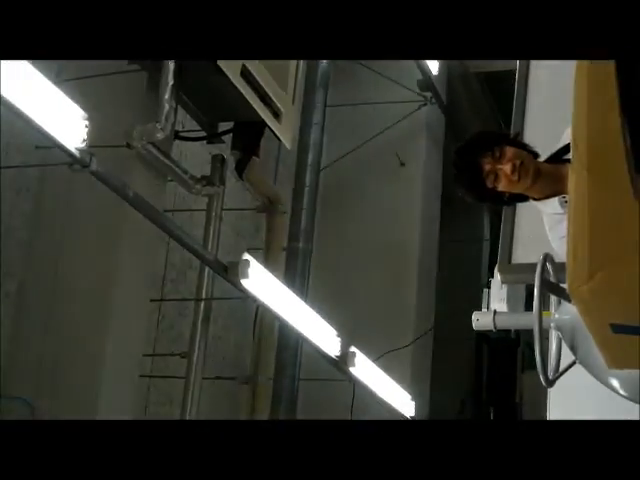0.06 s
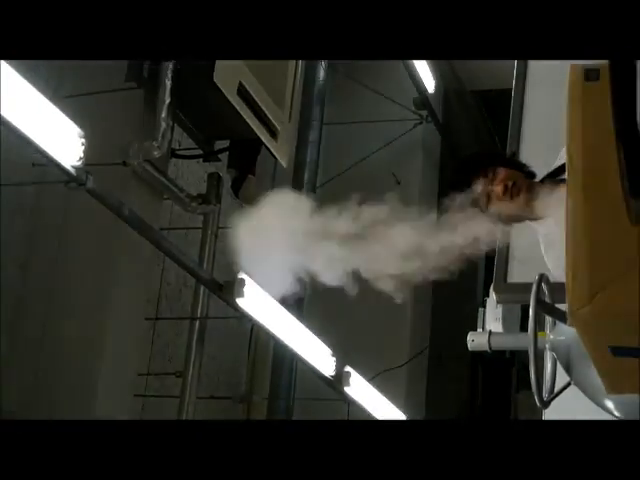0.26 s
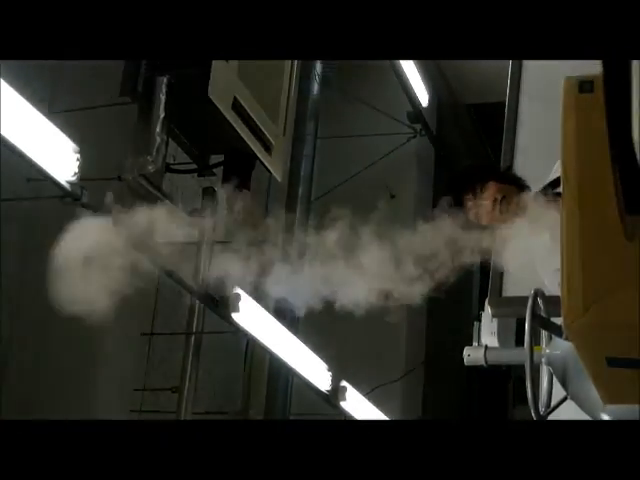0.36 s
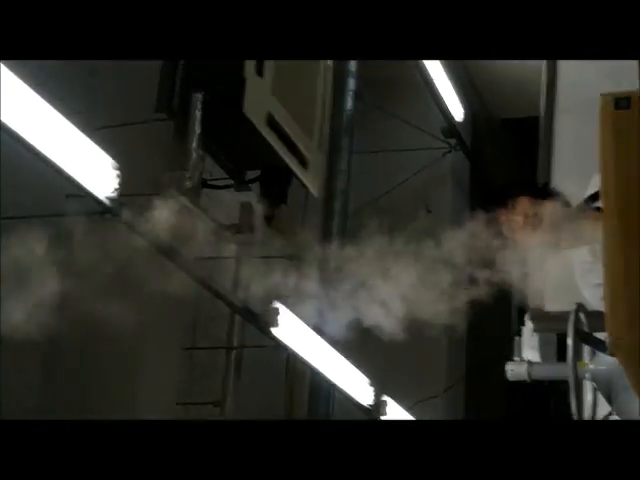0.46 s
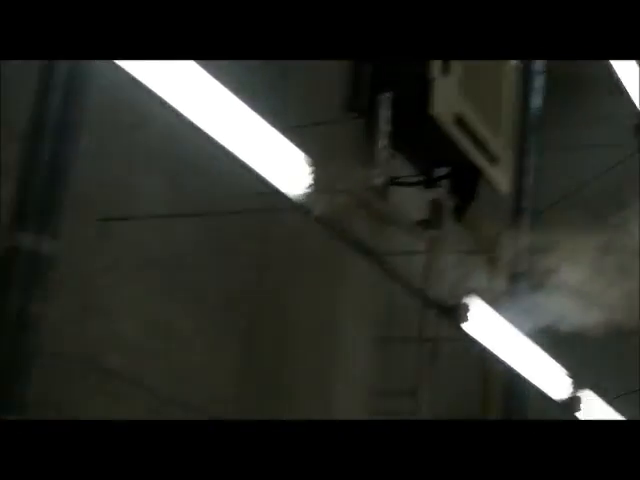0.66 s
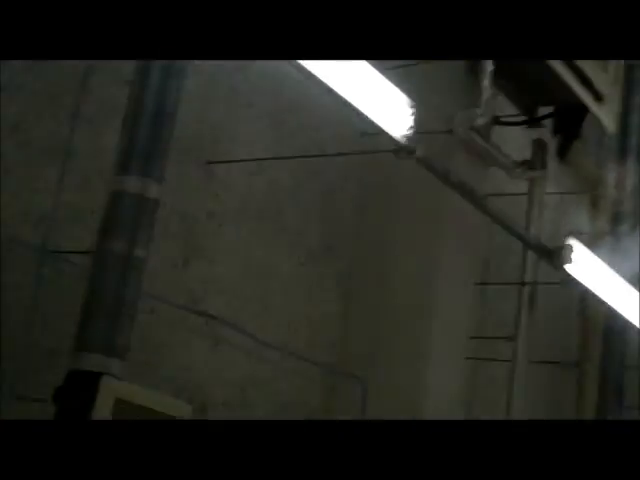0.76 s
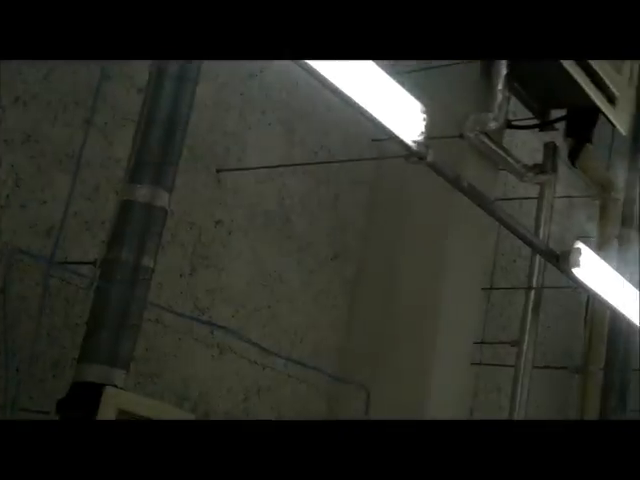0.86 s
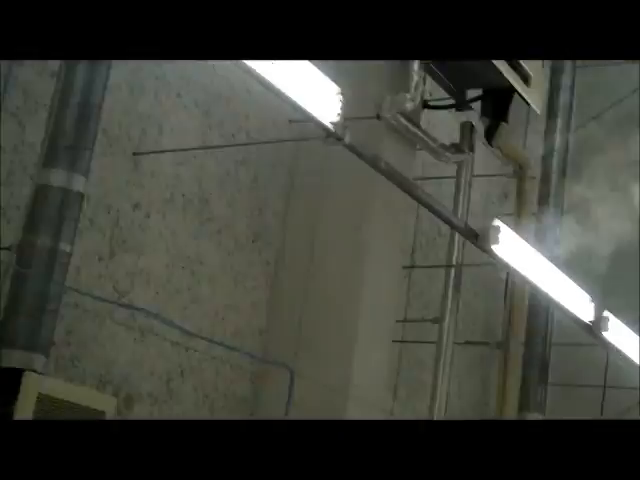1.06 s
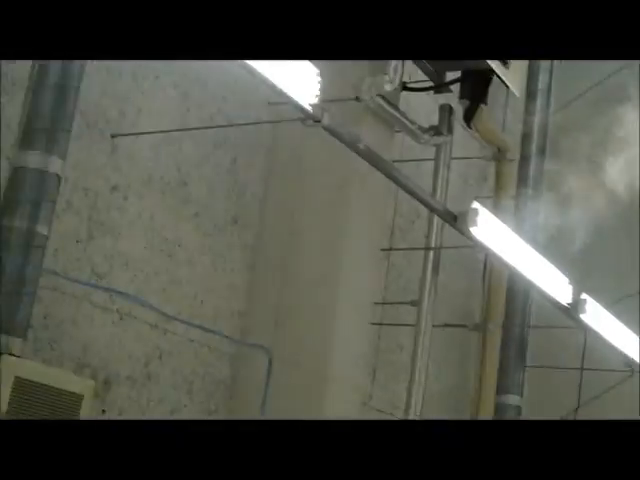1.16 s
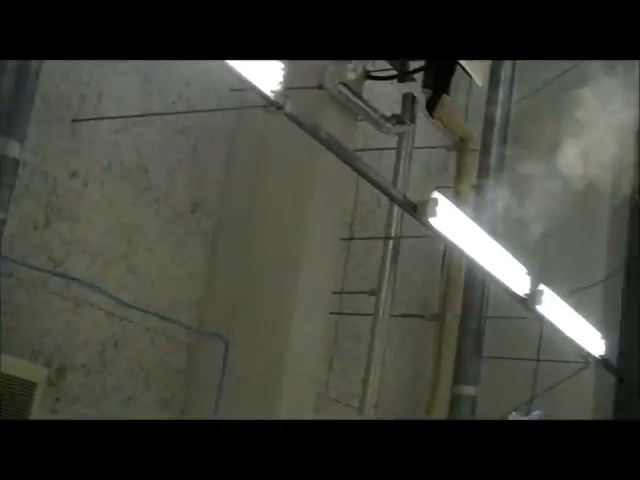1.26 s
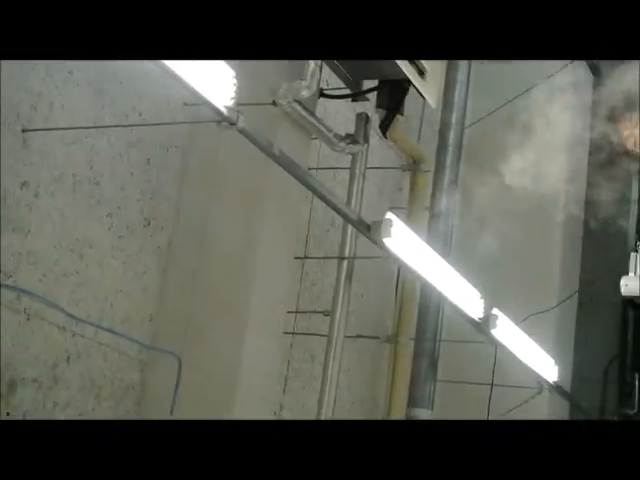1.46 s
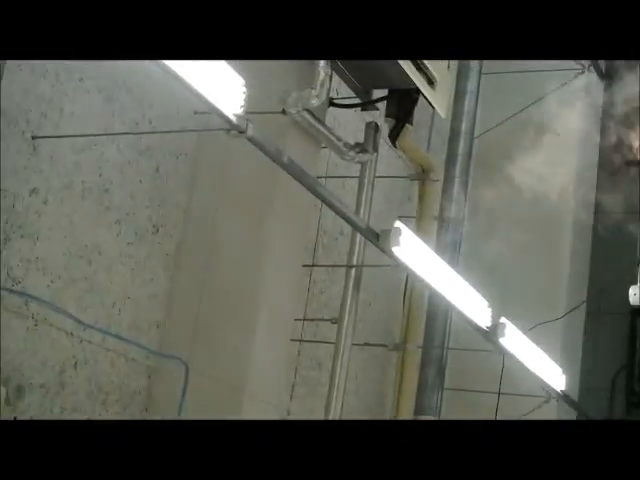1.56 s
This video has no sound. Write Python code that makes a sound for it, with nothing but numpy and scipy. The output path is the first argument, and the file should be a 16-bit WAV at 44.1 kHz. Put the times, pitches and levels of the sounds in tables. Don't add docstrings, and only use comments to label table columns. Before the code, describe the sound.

An air cannon booms once at 0.22 s, close and clipped, with a low thump near 200 Hz and a sharp jet crack. Before it, ventilation hums and a valve hiss fades. Hard walls return low swells for about half a second as the level ducks and recovers. A light plug taps at 0.70-0.77; metal links rattle at 0.95, 1.10 and 1.30, the last with a dull thud; air leaks thinly from 1.42.

```python
import sys
import numpy as np
from scipy import signal
from scipy.fft import rfft, irfft, next_fast_len
from scipy.io import wavfile

SR = 44100
rng = np.random.default_rng(int(sys.argv[2]) if len(sys.argv) > 2 else 0)


def log_audio(samples):
    frames = np.atleast_2d(samples).T
    limited = np.clip(frames, -1, 1)
    pcm = np.round(limited * 32767).astype(np.int16)
    wavfile.write(sys.argv[1], SR, pcm)


def boost_factor(decibels):
    exponent = np.asarray(decibels, float) / 20
    return 10 ** exponent


N = 70560

SHOT_S = 0.2205
PLUG_WET_DB = -12
RATTLE_STAY = 0.68

# pitch_hz, likeness [-1 to 1]
HALL_ALIKE = [(60, 0.87), (180, 0.92), (550, 0.84), (1650, 0.34), (4970, 0.091), (15000, -0.0041)]
# pitch_hz, level_db [per Hz]
JET_AHEAD = [(150, -21), (400, 1), (850, 2), (2500, -4.5), (4500, -5.5), (9000, -4), (15000, -4)]
# delay_s, level_db, pitch_hz, length_s
CEILING = (.0141, 3, 191, .022)


def unit(x):
    return x / np.sqrt(np.mean(x ** 2) + 1e-20)


def along(points, hz):
    f, v = np.transpose(points)
    return np.interp(np.log(hz + 1), np.log(f + 1), v)


def level(rows):
    s, db = np.transpose(rows)
    return boost_factor(np.interp(np.arange(N) / SR, s, db, left=-120, right=db[-1]))


def filtered(x, response):
    m = next_fast_len(x.shape[-1] + SR // 4)
    spectrum = rfft(x, m) * response(np.fft.rfftfreq(m, 1 / SR))
    return irfft(spectrum, m)[..., :x.shape[-1]]


def resonance(f, hz, width):
    return 1j * f * width / (hz * hz - f * f + 1j * f * width)


def pair(x, alike):
    def mix(hz):
        turn = np.arccos(np.clip(along(alike, hz), -1, 1)) / 2
        return np.array([np.cos(turn), np.sin(turn)])
    mid, side = filtered(x, mix)
    return np.array([mid + side, mid - side])


def air(spectrum, alike, size=N):
    noise = rng.standard_normal((2, size))
    coloured = filtered(noise, lambda hz: boost_factor(along(spectrum, hz)))
    return unit(pair(coloured, alike))


def burst(t, hold, t60):
    return (1 - np.exp(-t / 0.00033)) * boost_factor(-60 * np.maximum(t - hold, 0) / t60)


def add_at(out, s, sound):
    out[:, round(s * SR):][:, :sound.shape[-1]] += sound


def hall(x, stay=1, alike=HALL_ALIKE):
    # pitch_hz, t60_s
    hall_decay = [(100, 0.9), (220, 1.05), (500, .75), (1000, .8), (2000, 0.81), (6000, 0.73),
                  (14000, 0.58)]
    hz, t, z = signal.stft(rng.standard_normal((2, N)), SR, nperseg=256)
    t60 = stay * along(hall_decay, hz)[:, None]
    tail = signal.istft(z * boost_factor(-60 * t / t60), SR, nperseg=256)[1]
    build_up = 1 - np.exp(-np.arange(tail.shape[1]) / SR / 0.008)
    tail = pair(tail, alike) * build_up
    right_db = 1.5
    tail = tail * boost_factor([[-right_db / 2], [right_db / 2]]) / np.linalg.norm(tail[0])
    return signal.fftconvolve(x[None], tail, axes=1)[:, :N]


def ventilation():
    # pitch_hz, level_db [per Hz]
    vent_colour = [(20, -4), (60, -6.5), (130, -12), (250, -9), (500, -14), (1500, -18.5), (3600, -22),
                   (15700, -24.5)]
    # pitch_hz, likeness [-1 to 1]
    vent_alike = [(60, 0.6), (180, 0.86), (550, 0.48), (1650, 0.11), (4970, -0.14), (15000, 0.27)]
    # pitch_hz, width_hz, level_db [rms]
    duct_rows = [(235, 18.5, -54.5), (385, 58, -56.5), (682, 27, -56.5)]
    out = boost_factor(-41) * air(vent_colour, vent_alike)
    for hz, width, db in duct_rows:
        hum = filtered(rng.standard_normal(N), lambda f: resonance(f, hz, width) ** 2)
        out += boost_factor(db) * unit(hum)
    return out


def escaping_air():
    # time_s, level_db
    valve_rows = [
        (0.0, -39.5),
        (0.142, -58),
        (0.162, -56.5),
        (0.212, -46),
        (0.215, -48),
    ]
    # pitch_hz, level_db [per Hz]
    valve_colour = [(1000, -27), (2000, -10.5), (4000, -5), (7300, 0), (11000, -0.5), (15700, -13.5)]
    # time_s, level_db
    leak_rows = [
        (1.42, -57),
        (1.452, -51),
        (1.52, -42),
        (1.6, -43),
    ]
    # pitch_hz, level_db [per Hz]
    leak_colour = [(4000, -43), (8000, -19), (10500, -5), (12700, -2), (14000, -12), (15700, -32)]
    alike = [(2000, 0.28), (8000, 0.17)]  # pitch_hz, left-right likeness
    before_shot = np.arange(N) < SHOT_S * SR
    valve = level(valve_rows) * before_shot * air(valve_colour, alike)
    leak = level(leak_rows) * air(leak_colour, alike)
    return boost_factor(2.5) * valve + leak


def barrel_boom(t):
    swing = -boost_factor(11) * burst(t, 0.0098, 0.004) * np.sin(2 * np.pi * 212 * t + 0.75)
    overtone = boost_factor(-3) * burst(t, 0, 0.1) * np.sin(2 * np.pi * 370 * t)
    return swing + overtone


def jet(t):
    # pitch_hz, level_db [per Hz]
    jet_colour = [(150, -6), (600, -4), (1200, -11), (1900, -3), (2900, -5), (4500, -17), (9000, -24),
                  (15000, -26)]
    return burst(t, 0.008, 0.03) * air(jet_colour, [(1000, 0.86), (6000, 0.38)], size=len(t))


def wall_cracks(out, t):
    # delay_s, level_db
    crack_rows = [
        (.0105, -5),
        (.0145, -15),
        (.02, -18),
        (.031, -13.5),
        (.040, -16.5),
    ]
    for delay, db in crack_rows:
        noise = air(JET_AHEAD, HALL_ALIKE, size=len(t))
        crack = filtered(noise, lambda f: f / (f + 6000))
        add_at(out, SHOT_S + delay, boost_factor(db + 13) * burst(t, 0.0015, 0.014) * crack)


def wall_booms(out, t):
    # delay_s, level_db, pitch_hz, length_s
    boom_rows = [CEILING, (0.039, -12.5, 246, 0.013), (0.06, -9.5, 230, 0.014), (0.087, -10, 206, 0.021),
                 (.118, -10.5, 233.6, 0.03), (0.168, -13, 192, 0.038), (.2, -14, 221, 0.0333),
                 (0.24, -15, 199.6, 0.018), (0.278, -18.5, 235, .045), (0.338, -25, 198, 0.038),
                 (0.377, -27, 219, 0.017), (0.403, -26, 217, 0.045), (0.529, -36.5, 231.6, 0.043),
                 (.06, -19, 280, .04), (.19, -22, 275, .05), (.13, -33, 105, .1), (.38, -37, 135, .08)]
    for delay, db, hz, length in boom_rows:
        swell = np.sin(np.pi * np.clip(t / length, 0, 1))
        lag_s = 0.0003 * rng.normal() * np.array([[0.5], [-0.5]])
        add_at(out, SHOT_S + delay, boost_factor(db + 2) * swell * np.sin(2 * np.pi * hz * (t + lag_s)))


def shot():
    t = np.arange(SR // 8) / SR
    out = np.zeros((2, N + SR))
    boom = barrel_boom(t)
    add_at(out, SHOT_S, boom + jet(t))
    wall_cracks(out, t)
    wall_booms(out, t)
    start = round(SHOT_S * SR)
    low = np.pad(boom, (start, N))[:N]
    front = np.zeros(N)
    front[start] = boost_factor(43)
    jet_front = filtered(front, lambda f: boost_factor(along(JET_AHEAD, f)))
    return out[:, :N] + boost_factor(-13) * hall(low) + boost_factor(-15) * hall(jet_front)


def plug():
    # time_s, level_db [peak], dullness_db [lost per higher resonance]
    tap_rows = [
        (.7029, -16, 0.5),
        (.7045, -26, 1),
        (.7335, -27, 4),
        (.741, -26, 14),
        (.745, -25, 9),
        (.772, -30, 9),
    ]
    # pitch_hz, width_hz, level_db
    body_rows = [(765, 350, 6), (1200, 610, -1), (2100, 570, 2), (3140, 1200, -1.5), (5730, 1800, -7.5)]
    dry = np.zeros(N)
    for s, db, dull in tap_rows:
        tap = np.zeros(N)
        tap[round(s * SR)] = boost_factor(db + 20.5)

        def body(f):
            total = 0
            for k, (hz, width, body_db) in enumerate(body_rows):
                total = total + (-1) ** k * boost_factor(body_db - k * dull) * resonance(f, hz, width)
            return total
        dry += filtered(tap, body)
    dry = filtered(dry, lambda f: 1 / (1 + 1j * f / 6500) ** 2)
    return dry + boost_factor(PLUG_WET_DB) * hall(dry)


def links():
    # time_s, level_db [peak], length_s, ring_db [ring over scrape]
    contact_rows = [(.9500, -15, 0.0038, -2.5), (0.9553, -16, 0.0047, 2), (0.966, -12, 0.0022, 1),
                    (0.9695, -16, 0.003, 3.5), (0.9759, -13.5, 0.0057, 5), (.9850, -27, .008, -2),
                    (.9995, -24, .002, 6), (1.0378, -28, .001, 10), (1.1034, -12.5, .002, 7.5),
                    (1.106, -18.5, 0.0023, 4), (1.1104, -14.5, 0.0055, -5), (1.123, -24, 0.0082, -2),
                    (1.1347, -13, .002, 6), (1.145, -25, 0.0059, -6), (1.153, -27.5, 0.0031, 7),
                    (1.2982, -16, 0.0023, 1), (1.302, -22, .003, 2), (1.3208, -26, 0.0024, 2),
                    (1.3090, -26, .011, 0), (1.3270, -31, .012, 0), (1.0050, -28, .014, -2),
                    (1.1630, -30, .015, -4)]
    # pitch_hz, level_db, t60_s
    mode_rows = [(6100, -8, .006), (11770, -10, .008), (12580, -3, 0.0094), (12900, 4, 0.0072),
                 (13330, 1, 0.0058), (13900, -5, 0.0065), (14650, -8, 0.0063)]
    # pitch_hz, level_db [per Hz]
    scrape_colour = [(700, -52), (1200, -11), (3400, -6.5), (4500, -6.5), (6000, 0), (8000, -1.5),
                     (11000, -3.5), (15700, -5)]
    # pitch_hz, likeness [-1 to 1]
    rattle_alike = [(1500, .5), (4000, -.2), (9000, -.2), (13000, .2)]
    # pitch_hz, level_db
    far_colour = [(1000, 2), (6000, 2), (10000, 2.5), (13000, -7.5)]

    def modes(f):
        total = 0
        for hz, db, t60 in mode_rows:
            gain = boost_factor(db + rng.normal(0, 2.6))
            total = total + gain * resonance(f, hz * rng.normal(1, 0.015), 2.45 / t60)
        return total

    t = np.arange(SR // 16) / SR
    out = np.zeros((2, N + SR))
    for s, db, length, ring_db in contact_rows:
        rub = burst(t, length, 0.0068) * pair(rng.standard_normal((2, len(t))), [(12000, 0.51)])
        ring = boost_factor(ring_db) * filtered(rub, modes)
        scrape = boost_factor(-7) * burst(t, length, 0.02) * air(scrape_colour, rattle_alike, size=len(t))
        add_at(out, s, boost_factor(db - 3) * (ring + scrape))
    out = out[:, :N]
    far = filtered(out[0], lambda f: boost_factor(along(far_colour, f)))
    return out + boost_factor(-3.5) * hall(far, RATTLE_STAY, rattle_alike)


def thud():
    # time_s, level_db, pitch_hz, width_hz
    landing = (1.3035, -40, 2200, 700)
    s, db, hz, width = landing
    t = np.maximum(np.arange(N) / SR - s, 0)
    knock = burst(t, 0.008, 0.03) * rng.standard_normal(N)
    dry = boost_factor(db + 10) * filtered(knock, lambda f: resonance(f, hz, width))
    return dry + boost_factor(PLUG_WET_DB) * hall(dry, RATTLE_STAY)


def scene():
    return ventilation() + escaping_air() + shot() + plug() + links() + thud()


def low_pass(x):
    return signal.sosfilt(signal.butter(12, 15840, fs=SR, output="sos"), x)


def record(dry):
    # time_s, level_db
    gain_rows = [
        (0, -4),
        (.229, -3.5),
        (.234, -6.5),
        (.255, -9),
        (.3, -10),
        (.45, -4.5),
        (.7, -4.5),
        (.9, -3),
        (1.6, -3),
    ]
    x = filtered(dry * level(gain_rows), lambda f: (1j * f / (84 + 1j * f)) ** 2)
    clip_top, clip_hard = 0.97, 10
    x = x / (1 + np.abs(x / clip_top) ** clip_hard) ** (1 / clip_hard)
    return low_pass(x)


dry = scene()
out = record(dry)
log_audio(out)
```